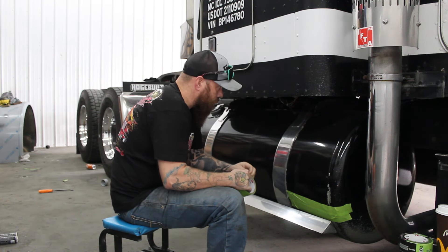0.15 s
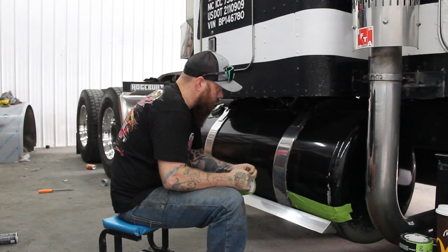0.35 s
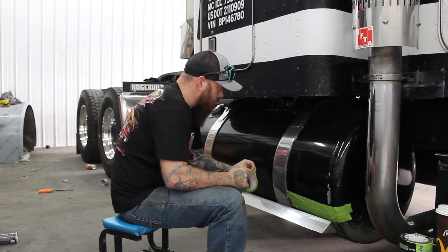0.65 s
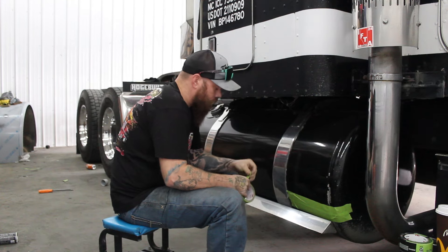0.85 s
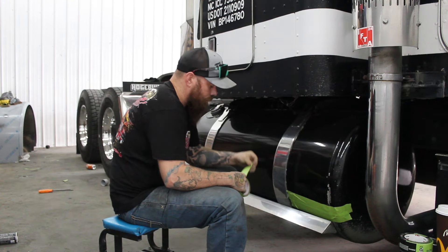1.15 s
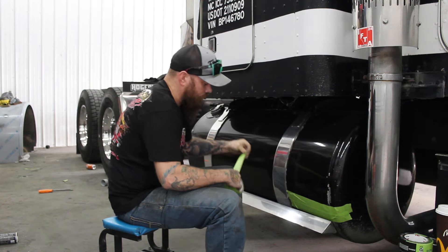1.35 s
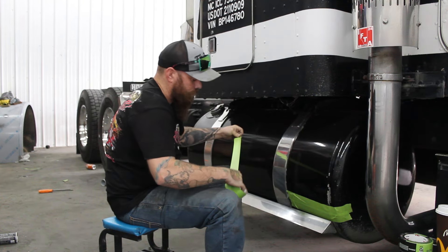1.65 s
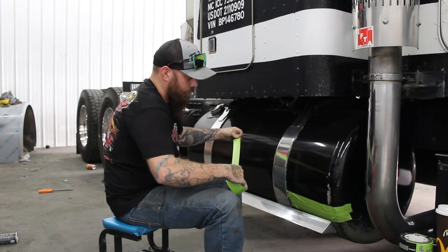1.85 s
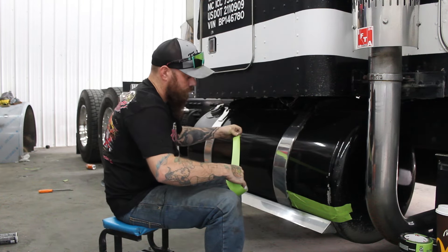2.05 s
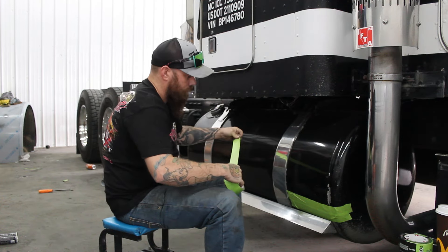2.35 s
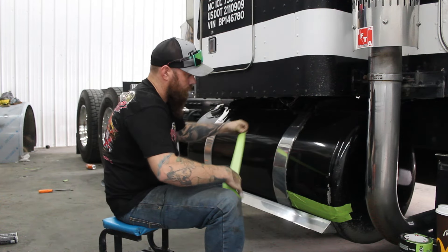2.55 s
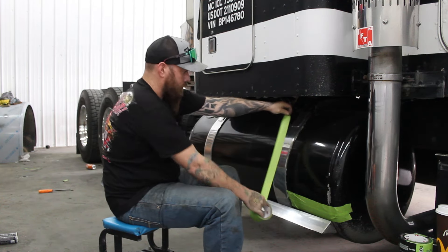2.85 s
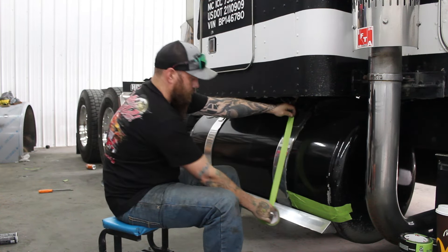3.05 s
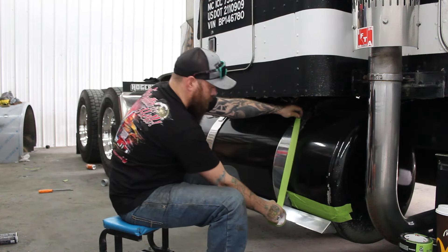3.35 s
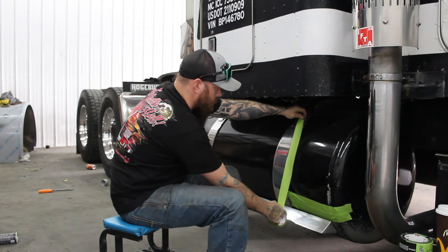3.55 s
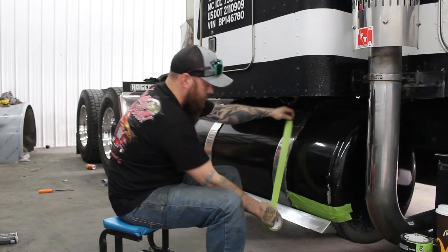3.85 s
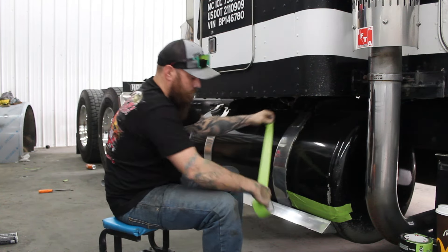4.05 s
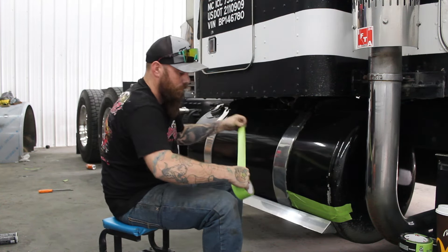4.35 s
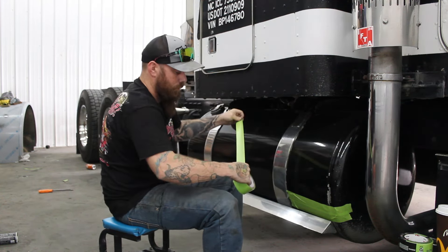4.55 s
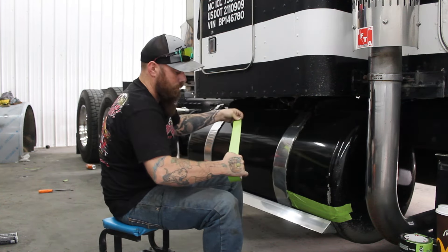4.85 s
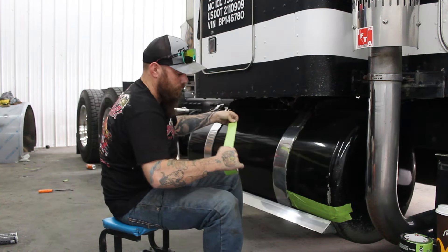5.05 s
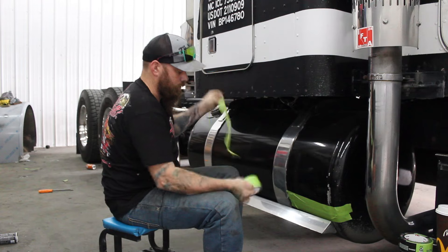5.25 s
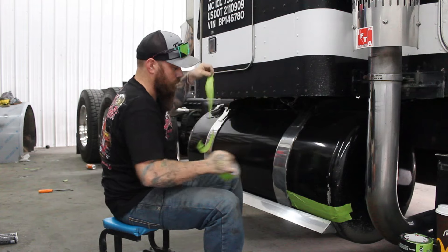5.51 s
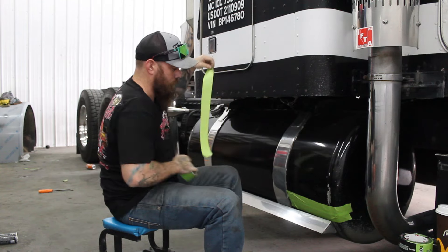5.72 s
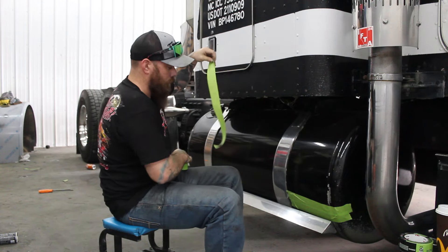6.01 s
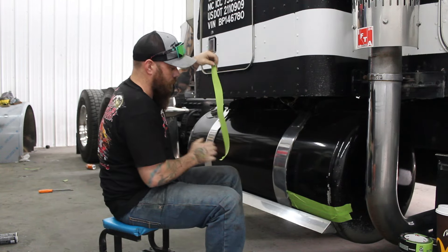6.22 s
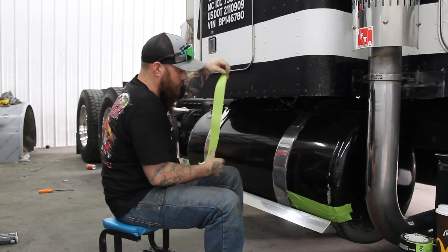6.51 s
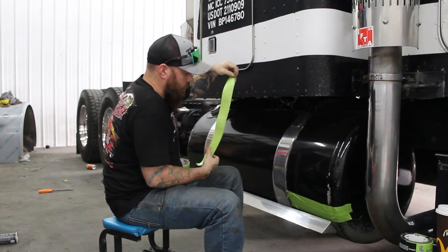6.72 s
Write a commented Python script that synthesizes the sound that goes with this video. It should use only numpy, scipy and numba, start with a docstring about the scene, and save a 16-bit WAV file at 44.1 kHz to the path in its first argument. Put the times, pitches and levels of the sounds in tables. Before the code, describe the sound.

A short bright rip of masking tape, a longer stuttering one and a slower, coarser jerk come in quick succession, with hollow knocks from the roll and a low thrum from the strip. The big, hard room echoes each one. After quiet sticky ticks and brushing, the strip snaps tight and is torn off with a papery crackle. Faint rumble and hiss lie beneath; single microphone, same in both channels.

```python
"""Masking tape ripped from its roll

Tape is jerked off its roll in a few short rips, snapped taut and torn off in a large hard-walled workshop.
The glue lets go in stick-slip bursts, synthesized as sparse noise, that ring the modes of the roll.
The hollow core knocks, the free strip thrums, and a hall of decaying noise bands rings on.
Gain control ducks under the loud rips and swells back over their tails."""
import sys
import numpy as np
from scipy import signal
from scipy.fft import rfft, irfft
from scipy.io import wavfile
from numba import njit

SR = 44100
rng = np.random.default_rng(int(sys.argv[2]) if len(sys.argv) > 2 else 0)


def gain_from_decibels(decibels):
    """Convert decibel values to linear amplitude factors."""
    exponent = np.asarray(decibels, float) / 20
    return 10 ** exponent


def log_audio(samples):
    """Write samples as a 16-bit WAV file to the path given in sys.argv[1]."""
    # one column per channel
    frames = np.atleast_2d(samples).T
    # limit to full scale, then quantise
    limited = np.clip(frames, -1, 1)
    pcm = np.round(limited * 32767).astype(np.int16)
    wavfile.write(sys.argv[1], SR, pcm)


N = 303270  # length [samples]


def unit(x):
    """Normalization: scales a signal to an rms of 1."""
    return x / np.sqrt(np.mean(x ** 2))


def band(x, low_hz, high_hz, order=2):
    """Band limitation: a Butterworth band-pass."""
    edges = [low_hz, min(high_hz, SR / 2.2)]
    return signal.sosfilt(signal.butter(order, edges, "band", fs=SR, output="sos"), x)


def colour(x, points):
    """Minimum-phase filtering: a folded cepstrum turns (Hz, dB) points into a causal filter of unit power."""
    hz, db = np.transpose(points)
    log_hz = np.log(np.fft.rfftfreq(2048, 1 / SR) + 1)
    log_gain = np.interp(log_hz, np.log(hz), db) * np.log(10) / 20
    cepstrum = irfft(log_gain)
    cepstrum[1:1024] *= 2
    cepstrum[1025:] = 0
    taps = irfft(np.exp(rfft(cepstrum)))
    return signal.fftconvolve(x, taps / np.sqrt(np.sum(taps ** 2)))[:len(x)]


def ring(x, modes):
    """Modal superposition: sums resonances (Hz, width Hz, dB), the gain being that at each centre."""
    out = 0
    for hz, width, db in modes:
        out = out + gain_from_decibels(db) * signal.lfilter(*signal.iirpeak(hz, hz / width, fs=SR), x)
    return out


def curve(rows):
    """Amplitude envelope: gain over time, linear in dB between (s, dB) rows."""
    s, db = np.transpose(rows)
    return gain_from_decibels(np.interp(np.arange(N) / SR, s, db))


def swell(rows, rise_share, rise_max_ms=99.):
    """Onset and decay: splits each row's length into a rise and a fall [ms]."""
    out = []
    for s, length_ms, *rest in rows:
        rise_ms = min(rise_share * length_ms, rise_max_ms)
        out.append((s, rise_ms, length_ms - rise_ms, *rest))
    return out


@njit
def follow(x, attack, release):
    """First-order relaxation: moves towards x at one pace upwards and another downwards."""
    e, out = 0., np.empty(len(x))
    for i in range(len(x)):
        e += (x[i] - e) * (attack if x[i] > e else release)
        out[i] = e
    return out


def crackle(size, share, spread_db):
    """Stick-slip as sparse impulses: tiny slips on a share of the samples, a few much larger than the rest."""
    chance = rng.random((size, 2)).T
    slips = rng.standard_normal(size) * (chance[0] < share)
    return unit(slips * gain_from_decibels(-spread_db * np.log(1 - chance[1])))


def bursts(rows, share, spread_db, high_hz=18000):
    """Modulated noise: rows (s, rise ms, fall ms, dB, lowest Hz[, highest Hz]) become swells of crackle."""
    out = np.zeros(N + SR)
    t = np.arange(SR // 5) * 1000 / SR  # ms
    for s, rise_ms, fall_ms, db, low_hz, *top in rows:
        ramp = np.minimum(t / rise_ms, 1 - (t - rise_ms) / fall_ms)
        shape = np.sin(np.pi / 2 * np.clip(ramp, 0, 1))
        edges = low_hz, top[0] if top else high_hz
        grains = crackle(len(t), share, spread_db)
        loss = np.sqrt(np.mean(band(grains, *edges, order=4) ** 2))  # level is set within the band
        start = int(s * SR)
        out[start:start + len(t)] += band(shape * grains, *edges, order=4) * gain_from_decibels(db) / loss
    return out[:N]


def shop_air():
    """Stationary broadband noise: shop air and microphone hiss as coloured Gaussian noise."""
    # noise spectrum: (frequency [Hz], relative level [dB])
    air_spectrum = [(15, -41), (25, -10.5), (70, -8), (277, -8.5), (545, -8.5), (840, -10), (1100, -12),
                    (1480, -11.5), (2610, -16), (12500, -29), (15000, -33), (16000, -39.5)]
    return gain_from_decibels(-57) * colour(rng.standard_normal(N), air_spectrum)


def machinery():
    """Narrow-band beating: two overlapping low noise bands waver as distant machinery winds down."""
    # rumble envelope: (time [s], level [dB])
    rumble_level = [(0, -55.5), (.7, -55.5), (1.2, -53.5), (2.4, -63.5), (3.2, -63.5), (4.8, -64.5),
                    (6.88, -70)]
    wide = unit(band(rng.standard_normal(N), 50, 170))
    narrow = unit(band(rng.standard_normal(N), 55, 72))
    return unit(wide + 0.7 * narrow) * curve(rumble_level)


def faint_drone():
    """Narrow-band noise: a faint wavering tone that fades."""
    # drone envelope: (time [s], level [dB])
    drone_level = [(0, -56), (.4, -61.5), (.9, -56.5), (1.2, -75.5)]
    centre_hz = 430
    return unit(band(rng.standard_normal(N), centre_hz - 25, centre_hz + 25)) * curve(drone_level)


def hall(x):
    """Diffuse reverberation: third-octave noise bands die at their own rates after a gradual build-up."""
    # reverberation time: (frequency [Hz], time to fall 60 dB [s])
    hall_t60 = [(125, 0.81), (500, 0.76), (1500, 1.01), (3000, 0.99), (5000, 0.94), (7000, 0.68),
                (10000, 0.5), (15000, 0.42)]
    hall_db, rise_ms = -5.5, 8.1
    nearby_db, nearby_t60 = -10, .3  # bright early scatter off metal bodywork close by; t60 in s
    t = np.arange(int(1.6 * SR)) / SR
    centres = 90 * 2 ** np.arange(0, 7.7, 1 / 3)
    hz, seconds = np.transpose(hall_t60)
    t60s = np.interp(np.log(centres), np.log(hz), seconds)
    tail = np.zeros(len(t))
    for centre, t60 in zip(centres, t60s):
        noise = rng.standard_normal(len(t))
        tail += band(noise, centre / 2 ** (1 / 6), centre * 2 ** (1 / 6)) * gain_from_decibels(-60 * t / t60)
    nearby = rng.standard_normal(len(t)) * gain_from_decibels(-60 * t / nearby_t60)
    build = 1 - np.exp(-(t * 1000 / rise_ms) ** 2)
    echo = gain_from_decibels(hall_db) * unit(build * tail) + gain_from_decibels(nearby_db) * unit(build * nearby)
    return signal.fftconvolve(x, echo / np.sqrt(len(t)))[:N]


def handling():
    """Adhesion and friction: fingertip ticks and brushing rustles are brief bands of sparse noise."""
    # sticky side plucked off a fingertip: (time [s], level [dB], lowest [Hz], highest [Hz])
    ticks = [(2.580, -51.5, 900, 9000), (3.671, -49.5, 2200, 15000), (3.699, -51, 2800, 13900),
             (3.714, -51, 2800, 15000), (3.732, -48, 2500, 14700), (3.743, -41, 2240, 12000),
             (3.770, -58, 1500, 4500), (4.016, -40, 2000, 15180), (4.024, -55, 1620, 3000),
             (4.198, -54, 1500, 9000), (6.447, -62, 600, 6000), (6.820, -62.5, 2000, 7000)]
    # hands and loose tape brushing: (time [s], length [ms], level [dB], lowest [Hz], highest [Hz])
    rustles = [(.630, 186, -50.5, 3010, 15200), (2.697, 82, -52, 1100, 14720),
               (3.476, 40, -57, 255.3, 1970), (3.500, 43, -63, 300, 900), (3.548, 44, -69, 250, 894),
               (3.876, 58, -55, 3000, 15300), (3.900, 270, -61, 490, 4080), (4.020, 49, -53, 400, 2680),
               (4.197, 25, -56.5, 586, 1300), (4.320, 20, -49.5, 1800, 9100), (4.230, 85, -66.5, 404, 3420),
               (5.730, 210, -58.5, 596, 5430), (5.830, 94, -61, 4000, 13970), (5.945, 24, -59, 3980, 15000),
               (6.846, 34, -48, 1500, 15470)]
    # skin and loose paper: (frequency [Hz], relative level [dB])
    handling_colour = [(200, 4), (2200, 4.5), (4500, 2), (7000, -4), (16000, -5)]
    rise_ms, fall_ms = 1, 11.3  # of a tick
    rows = [(s, rise_ms, fall_ms, *rest) for s, *rest in ticks] + swell(rustles, rise_share=0.18)
    return colour(bursts(rows, share=.25, spread_db=1.8), handling_colour)


def tear():
    """Fracture noise: paper tearing across gives overlapping swells of crackle."""
    # stages of the tear: (time [s], length [ms], level [dB], lowest [Hz])
    tear_stages = [(5.235, 4.4, -31, 1500), (5.238, 15, -25, 396), (5.251, 30, -14.5, 306),
                   (5.272, 24, -20.5, 610), (5.292, 35, -23, 1800), (5.308, 10, -22, 1800)]
    # torn paper: (frequency [Hz], relative level [dB])
    tear_colour = [(88, -50), (150, -9), (524, -12.5), (821, -14.5), (1060, -9.5), (2060, -10), (3220, -4),
                   (4490, -6), (11300, -10), (16000, -20)]
    return colour(bursts(swell(tear_stages, rise_share=0.47), share=.3, spread_db=1.5), tear_colour)


def snap():
    """Impulsive tension: the strip jerked taut radiates bursts with a very short rise."""
    # parts of the snap: (time [s], fall [ms], level [dB], lowest [Hz])
    snap_parts = [(4.342, 6.1, -18.5, 514), (4.352, 28, -21, 150), (4.370, 37, -27, 149)]
    # taut strip: (frequency [Hz], relative level [dB])
    snap_colour = [(120, -21.5), (450, -8), (1200, -11.5), (2300, -12), (3300, -5.5), (5000, -6.5),
                   (5900, -17.5), (6600, -6), (8500, -8.5), (9500, -14), (16000, -22)]
    rise_ms = 0.55
    rows = [(s, rise_ms, *rest) for s, *rest in snap_parts]
    return colour(bursts(rows, share=.25, spread_db=1.8), snap_colour)


def strip_thrum():
    """Membrane resonance: the free strip flaps like a slack drum skin, low noise exciting its modes."""
    # flaps: (time [s], length [ms], relative level [dB])
    flaps = [(1.150, 200, -29.5), (1.240, 360, -29.5), (1.410, 71, -20), (3.485, 104, -54.5),
             (3.545, 250, -61.5), (5.245, 92, -45)]
    # modes of the strip: (frequency [Hz], width [Hz], relative level [dB])
    strip_modes = [(114.7, 5.7, -4), (179, 51, -9), (200, 23, 3), (300, 28.3, 0)]
    rows = [(*row, 102, 345) for row in swell(flaps, rise_share=.3)]  # lowest, highest Hz
    return gain_from_decibels(3.0) * ring(bursts(rows, share=0.89, spread_db=1.0), strip_modes)


def knocks():
    """Impulse excitation: one rounded push at each jolt of the roll in the hand."""
    # knocks on the core: (time [s], relative level [dB])
    jolts = [(.736, -1), (.772, -7), (1.121, -3.5), (1.151, -11), (1.237, -9.5), (1.432, 5), (1.455, 11)]
    push_ms = 1.3
    s, db = np.transpose(jolts)
    out = np.zeros(N)
    out[(s * SR).astype(int)] = gain_from_decibels(db)
    pushes = np.convolve(out, np.hanning(int(push_ms * SR / 1000)))[:N]
    return band(pushes, 371, 560, order=3)


def hollow_core():
    """Coupled resonance: knocks and finger drag ring the core, and a hollow metal tank close by hums along."""
    # core dragging over the fingers as the roll turns: (time [s], length [ms], relative level [dB])
    drags = [(.740, 59, -18), (1.125, 76, -28), (1.240, 124, -23), (1.428, 160, -13.5)]
    # modes of the core: (frequency [Hz], width [Hz], relative level [dB])
    core_modes = [(377, 20, 1), (422, 26, -3), (500, 110, -5), (620, 90, -10), (750, 140, -12)]
    # mode of the tank: (frequency [Hz], width [Hz], relative level [dB])
    tank_modes = [(380, 3.14, 3)]
    rows = [(*row, 345, 820) for row in swell(drags, rise_share=0.22)]  # lowest, highest Hz
    core = ring(knocks() + bursts(rows, share=0.96, spread_db=2.5), core_modes)
    return gain_from_decibels(5.5) * (core + ring(core, tank_modes))


def glue_releases():
    """Stick-slip timing: rows (s, rise ms, fall ms, dB, slip rate Hz) of the jerks and pulls."""
    # short jerks sharing one shape: (time [s], relative level [dB], slip rate [Hz])
    jerks = [(0.028, -26, 4464), (0.035, -29, 1600), (.043, -22, 1200), (1.117, -20, 900),
             (1.125, -17, 900), (1.149, -10, 900), (1.174, -8, 800), (1.197, -8, 600), (1.222, -10, 1000),
             (1.399, -13.5, 400), (1.426, -6.5, 199)]
    # longer pulls: (time [s], length [ms], relative level [dB], slip rate [Hz])
    pulls = [(.700, 46, -15, 2420), (.712, 53, -9.5, 1350), (.736, 28, -12, 749), (1.240, 44, -10.5, 374),
             (1.262, 190, -19.5, 404), (1.411, 23, -16, 400), (1.440, 100, -4.5, 137.4),
             (1.491, 196, -13.5, 191)]
    rise_ms, fall_ms = 6.5, 15.5  # of a jerk
    rows = [(s, rise_ms, fall_ms, db, slip_hz) for s, db, slip_hz in jerks]
    return rows + swell(pulls, rise_share=0.2, rise_max_ms=19)


def sizzle(releases):
    """Separate slips: slow ones come singly and sizzle; above a knee it fades per octave of slip rate."""
    level_db, knee_hz, db_per_octave = -9.5, 250, 7.5
    rows = []
    for s, rise_ms, fall_ms, db, slip_hz in releases:
        octaves = max(np.log2(slip_hz / knee_hz), 0)
        rows.append((s, rise_ms, fall_ms, db + level_db - db_per_octave * octaves, 7600, 15500))
    return bursts(rows, share=0.28, spread_db=0.5)


def glue_slips(releases):
    """Stick-slip radiation: slips sound from the strip and ring the roll, with the slip rate as low cut."""
    # slip spectrum: (frequency [Hz], relative level [dB])
    rip_colour = [(100, 3), (600, -8), (1200, -1.5), (2500, -1), (6000, -2.5), (12000, -8), (16000, -22)]
    # modes of roll and stretched strip: (frequency [Hz], width [Hz], relative level [dB])
    roll_modes = [(614, 17, -26.5), (1000, 149, 3.5), (1470, 190, -5.5), (1800, 78, 3.5), (2120, 250, 0),
                  (2980, 590, -2), (3820, 260, -8), (5100, 130, -19)]
    slips = colour(bursts(releases, share=.4, spread_db=1), rip_colour)
    return gain_from_decibels(-1.5) * (slips + ring(slips, roll_modes))


def scene():
    """Superposition: direct sound, hall and background meet at one microphone that feeds both channels."""
    releases = glue_releases()
    rips = glue_slips(releases) + sizzle(releases) + hollow_core() + strip_thrum()
    near = rips + snap() + tear() + handling()
    background = shop_air() + machinery() + faint_drone()
    return np.tile(near + hall(near) + background, (2, 1))


def band_limit(x):
    """A steep low-pass at the top of the band."""
    return signal.sosfilt(signal.butter(12, 16460, fs=SR, output="sos"), x)


def record(dry, top_db=-20, ratio=5., attack_ms=30., release_ms=170.):
    """Dynamic compression: gain falls under loud sound and recovers slowly; then soft limiting and filters."""
    power = follow(dry[0] ** 2, 1000 / (8. * SR), 1000 / (20. * SR))  # 8 ms up, 20 ms down
    over_db = np.maximum(10 * np.log10(power + 1e-12) - top_db, 0) * (1 - 1 / ratio)
    cut_db = follow(over_db, 1000 / (attack_ms * SR), 1000 / (release_ms * SR))
    x = dry * gain_from_decibels(-cut_db)
    x = x / (1 + (x / .9) ** 6) ** (1 / 6)  # soft limit at 0.9
    x = x - .45 * signal.lfilter(*signal.iirpeak(11300, 45, fs=SR), x)  # narrow dip of the microphone
    x = signal.sosfilt(signal.ellip(6, .3, 50, 15900, fs=SR, output="sos"), x)  # top cut
    return band_limit(x)


dry = scene()
out = record(dry)
log_audio(out)
```